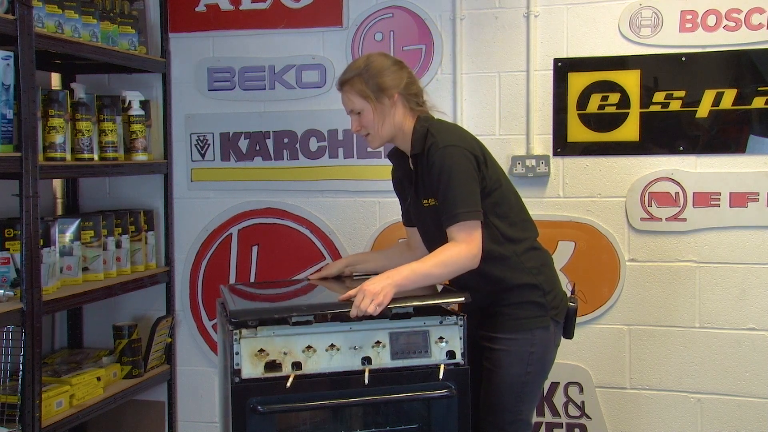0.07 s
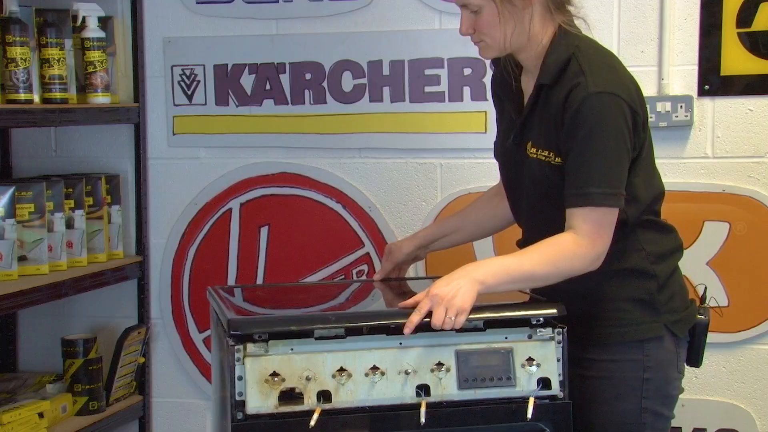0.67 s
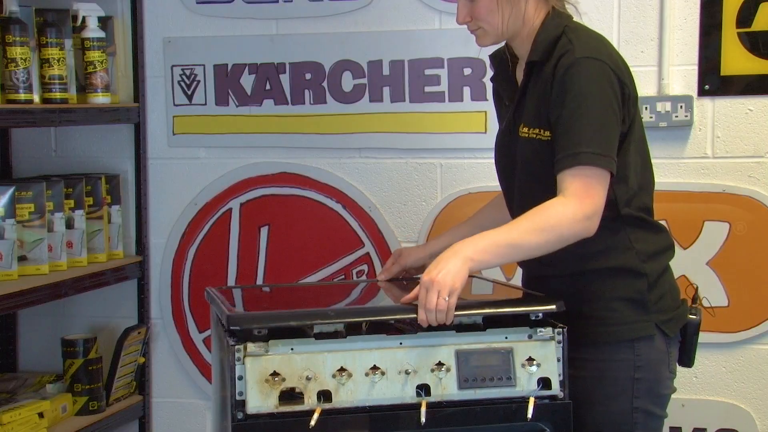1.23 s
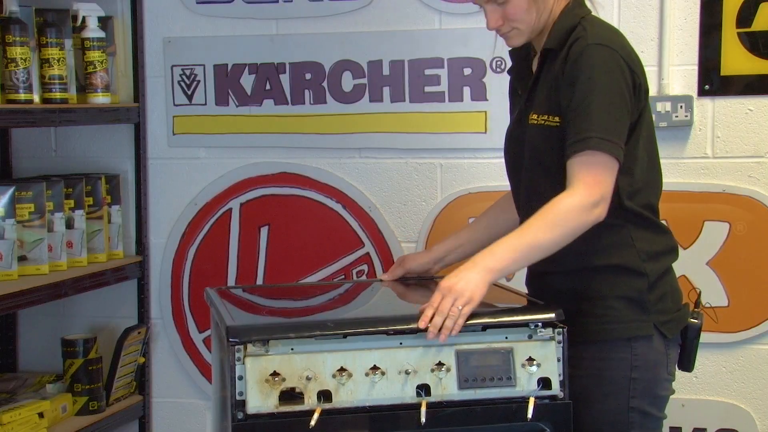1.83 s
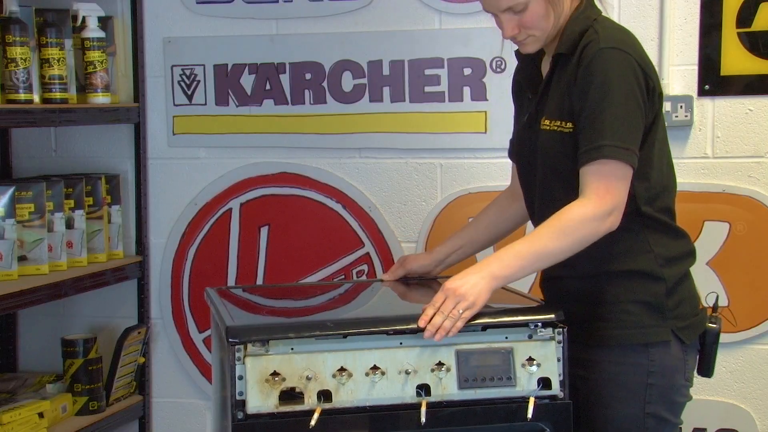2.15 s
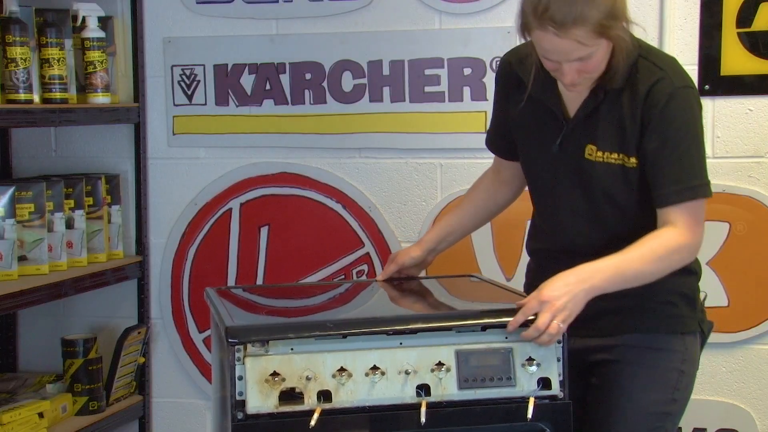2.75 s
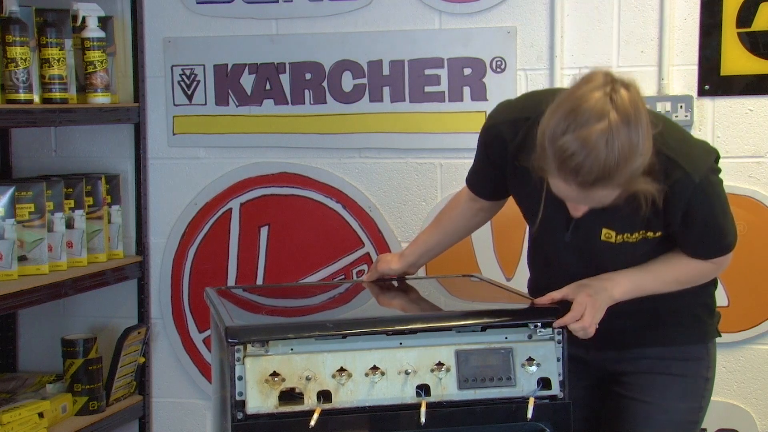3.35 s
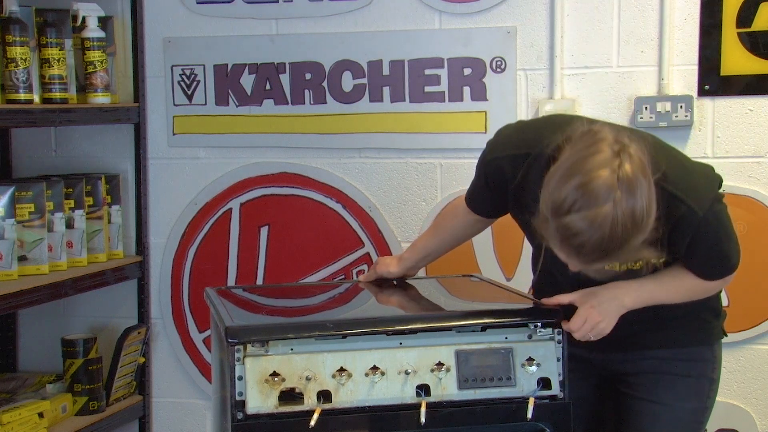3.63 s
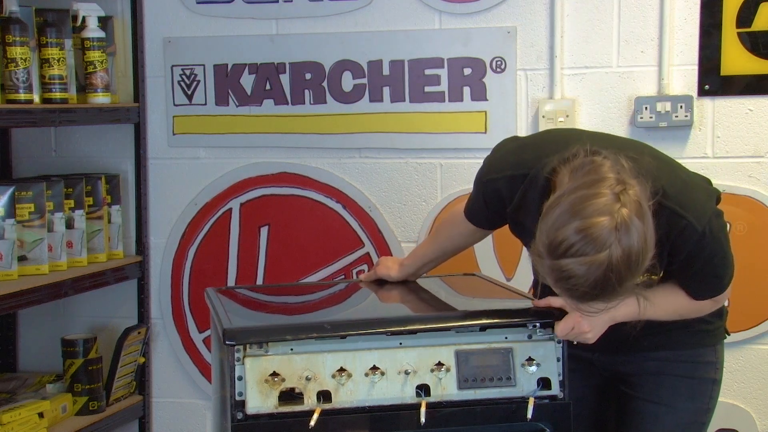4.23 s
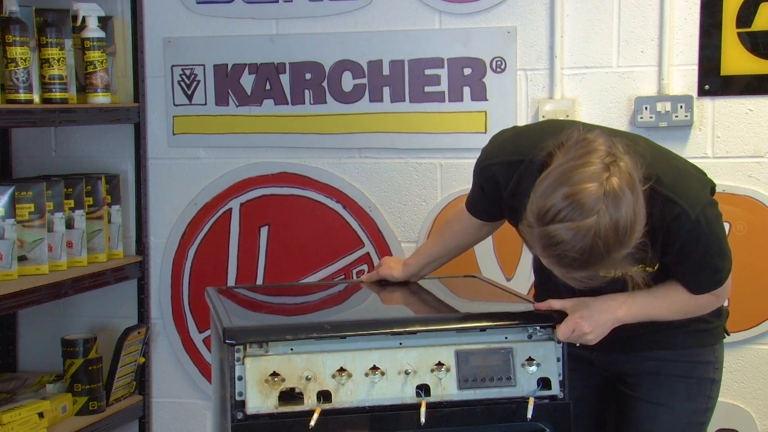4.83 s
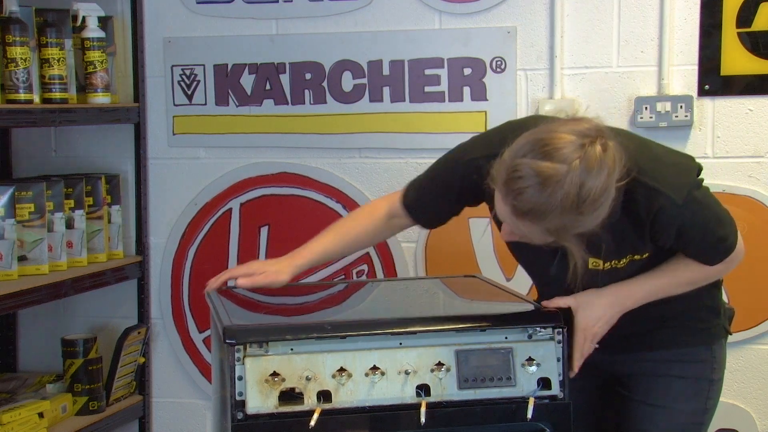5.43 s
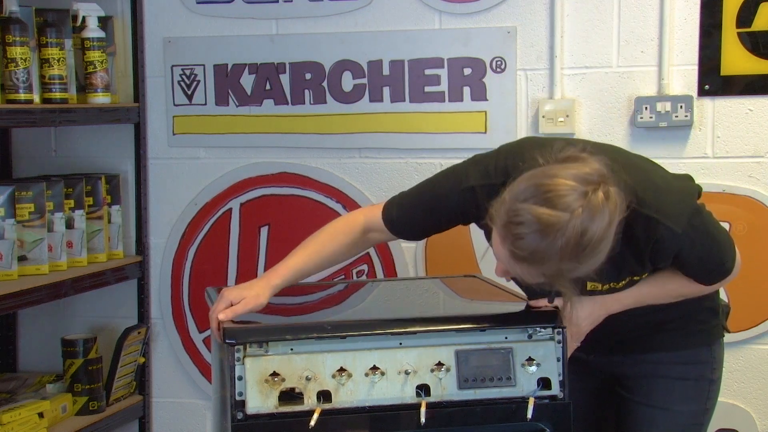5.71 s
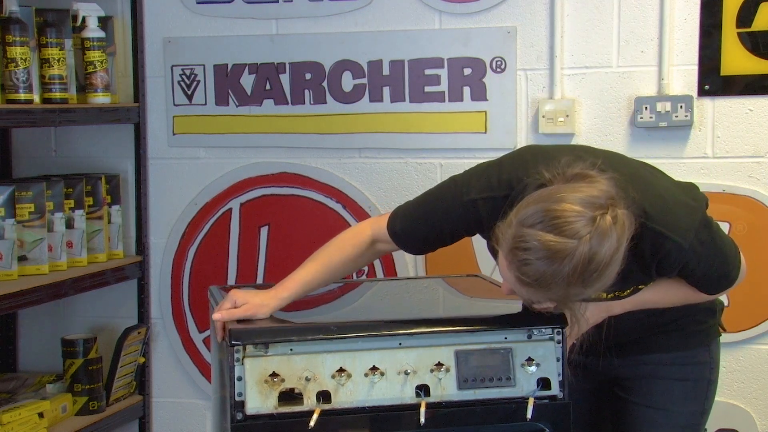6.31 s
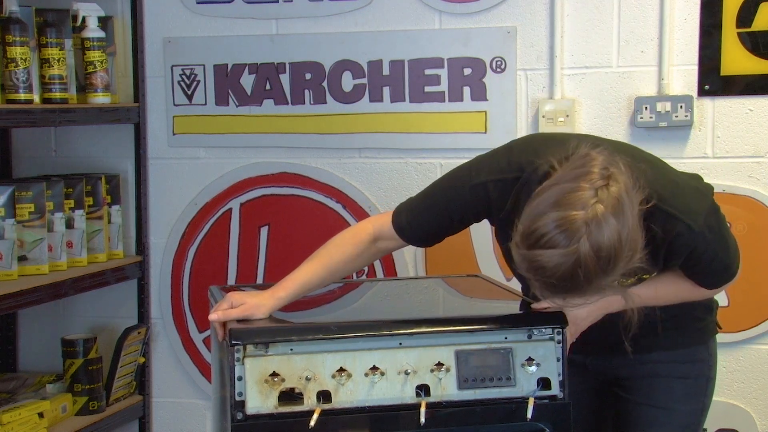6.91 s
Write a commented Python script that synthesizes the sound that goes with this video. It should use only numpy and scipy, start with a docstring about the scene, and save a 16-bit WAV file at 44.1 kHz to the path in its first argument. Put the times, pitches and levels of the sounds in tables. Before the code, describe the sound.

A thin steel panel knocks and clatters down onto a hollow oven cabinet, each hit leaving a short metallic ring. Its edges stick and slip along the frame in brief scrapes, with a few light taps and pauses. More knocks lead to one firm clank, then a final bunch of softer knocks and scrapes. Faint workshop air and a low hum continue underneath.

```python
"""Over faint workshop air and mains hum, a sheet-metal top panel is lowered onto an oven.
It lands in a flurry of knocks, loudest from 0.7 to 1.5 s: each a snap and a short clatter of thin
sheet, with panel and hollow cabinet ringing on. Shifted by hand, its edges stick and slip along the
frame in short scrapes among sparse, lighter taps. From about 4 s it is pressed home, with a firm
clank near 4.75 s and a last cluster of knocks and scrapes around 6 s."""
import sys
import numpy as np
from scipy import signal
from scipy.fft import rfft, irfft, next_fast_len
from scipy.io import wavfile

SR = 44100
rng = np.random.default_rng(int(sys.argv[2]) if len(sys.argv) > 2 else 0)


def digitize_waveform(pressure):
    """Quantize a signal to 16-bit integers and store it at the path in sys.argv[1].

    Rows of a 2-D input are taken as channels; values are limited to [-1, 1].
    """
    field = np.atleast_2d(pressure).T
    bounded = np.clip(field, -1, 1)
    quanta = np.round(bounded * 32767).astype(np.int16)
    wavfile.write(sys.argv[1], SR, quanta)


N = 307377
T = np.arange(int(1.2 * SR)) / SR  # seconds within one contact
FFT_SIZE = 65536
HZ = np.fft.rfftfreq(FFT_SIZE, 1 / SR)


def amp(db):
    """Decibels to gain."""
    return 10 ** (np.asarray(db) / 20)


def along(curve, hz):
    """Read a curve of (frequency, value) points on a log frequency axis."""
    freqs, values = np.transpose(curve)
    return np.interp(np.log(hz + 1), np.log(freqs + 1), values)


def fade(t, t60):
    """Exponential decay, 60 dB down after t60 seconds."""
    return np.exp(-np.log(1000) * t / np.maximum(t60, 1e-4))


# Bass-heavy EQ of the room tone: freq_hz, gain_db
ROOM_EQ = [(12, -24.5), (20, -16.5), (43, 1), (101, -1), (127, -5), (193, -8.5), (301, -11.5), (377, -11.5),
           (410, -14), (1290, -25.5), (1810, -27), (12100, -35), (16000, -36.5)]
# Mains hum partials: pitch_hz, level_db
MAINS_HUM = [(50, -68), (100, -67.5)]

def room_tone():
    """The bed: steady workshop air with a faint mains hum."""
    size = next_fast_len(N + SR)
    eq = amp(along(ROOM_EQ, np.fft.rfftfreq(size, 1 / SR)))
    air = irfft(rfft(rng.standard_normal(size)) * eq, size)[:N]
    air /= np.sqrt(np.mean(air ** 2))
    t = np.arange(N) / SR
    hum = sum(amp(db) * np.sqrt(2) * np.sin(2 * np.pi * (hz * t + rng.random())) for hz, db in MAINS_HUM)
    return amp(-61) * air + hum


# Modes of panel and cabinet: pitch_hz, relative_db, t60_s
STEEL_MODES = [(85.22, 10.5, 1.08), (128.06, 17.5, 0.68), (196, 6.5, 0.61), (215, 8, 1.07),
               (258.3, 6, 1.12), (293.5, 12.5, 1.04), (442, 9.5, 1.17), (494, 0, 1.38), (580, -4, 1.2),
               (700, -4, 0.69), (719, 3.5, 1.6), (793, 8.5, 1.2), (878, 9, 0.48), (945, 0.5, 1.94),
               (1020, -6.5, 1.4), (1045, 10.5, 0.81), (1104, 2, 0.73), (1233, 9, 0.67), (1412, -0.5, 1.07),
               (1350, 5.5, 0.32), (1530, 17.5, 0.17), (1590, 13, 0.38), (2061, 24.5, 0.17), (2364, -1, 0.5),
               (2505, -1.5, 0.54), (3230, 7, 0.63), (3970, -17.5, 0.18)]

def steel_modes():
    """The pitched ring of the steel: one decaying complex sine per mode."""
    modes = [amp(db) * fade(T, t60) * np.exp(2j * np.pi * hz * T) for hz, db, t60 in STEEL_MODES]
    return np.array(modes, np.complex64)


# Quick clatter of the sheet: freq_hz, t60_s
CLATTER_DECAY = [(50, 0.3), (200, 0.26), (1000, 0.15), (4000, 0.09), (12000, 0.068)]
# Lingering wash of cabinet and room: freq_hz, t60_s
WASH_DECAY = [(50, 2.5), (100, 1.5), (300, 1.0), (800, 0.8852), (1500, 0.79), (3000, 0.36), (6000, 0.15),
              (14000, 0.23)]
# EQ of the wash against the clatter: freq_hz, gain_db
WASH_EQ = [(50, -18), (120, -8.5), (400, -8), (1500, -15), (4000, -5), (12000, -4)]

def panel_response(modes, ring_db, modes_db):
    """The panel answers a contact with clatter, then a tail of wash and modes set by ring_db."""
    hz, t, noise = signal.stft(rng.standard_normal((2, len(T))), SR, nperseg=256)
    clatter = noise[0] * fade(t, along(CLATTER_DECAY, hz)[:, None])
    wash = noise[1] * fade(t, along(WASH_DECAY, hz)[:, None])
    wash *= amp(along(WASH_EQ, hz) + ring_db)[:, None]
    dense = signal.istft(clatter + wash, SR, nperseg=256)[1][:len(T)]
    # every contact point drives the modes with its own strengths and phases
    drive = amp(2 * rng.standard_normal(len(modes))) * np.exp(2j * np.pi * rng.random(len(modes)))
    ring = (drive.astype(np.complex64) @ modes).real
    return dense + amp(modes_db + ring_db) * ring


def equalise(sound, gain_db):
    """Minimum-phase EQ with a gain at each frequency of HZ; nothing rings ahead of the attack."""
    cepstrum = irfft(np.log(amp(gain_db)))
    cepstrum[1:FFT_SIZE // 2] *= 2
    cepstrum[FFT_SIZE // 2 + 1:] = 0
    return irfft(rfft(sound, FFT_SIZE) * np.exp(rfft(cepstrum)))[:len(T)]


# Borders of the thud, boom, knock, clank, clink and tick bands: edge_hz
BAND_EDGES = [25, 90, 300, 800, 1800, 5500, 16000]
BAND_HZ = np.sqrt(np.multiply(BAND_EDGES[1:], BAND_EDGES[:-1]))

def band_levels(balance_db, strength_db, tilt_db, thud_db, spot_hz, spot_db):
    """Thud, then five upper bands: each contact's tilt sets its brightness, and it favours its spot."""
    hz = BAND_HZ[1:]
    brightness_db = tilt_db * np.log2(hz / 700)
    skirt_db = 0.89 * spot_db * np.exp(-(np.log2(hz / spot_hz) / 0.75) ** 2)  # broad lift at the spot
    return np.r_[thud_db, strength_db + np.array(balance_db) + brightness_db + skirt_db]


# How well the sheet radiates: freq_hz, gain_db
SHEET_EQ = [(20, -11.5), (50, -8.5), (83, 6), (130, 3.5), (205, 5.5), (295, 5.5), (470, 2), (750, 3),
            (1350, 5.5), (2000, 1.5), (3200, 0), (5000, -3), (11000, -10), (16000, -21)]

def voice_contact(sound, start_s, levels_db, spot_hz, spot_db):
    """Colour a sound by its spot on the sheet; steer its bands to levels_db over 60 ms from start_s."""
    # each spot has one strong resonance and many weak, unevenly excited ones
    peak_db = spot_db / (1 + (np.log((HZ + 1) / spot_hz) / 0.13) ** 2)
    ripple_hz = np.geomspace(350, 12000, 150)
    ripple_db = np.interp(HZ, ripple_hz, 2.5 * rng.standard_normal(len(ripple_hz)), 0, 0)
    gain_db = peak_db + along(SHEET_EQ, HZ) + ripple_db
    count = int(0.06 * SR)
    window = sound[int(start_s * SR):][:count]
    power = 2 * np.abs(rfft(window, FFT_SIZE)) ** 2 / (FFT_SIZE * count)
    for _ in range(2):  # neighbouring bands overlap, so their gains settle in two steps
        band_power = np.add.reduceat(power * amp(2 * gain_db), np.searchsorted(HZ, BAND_EDGES))[:-1]
        trim_db = levels_db - 10 * np.log10(band_power + 1e-20)
        gain_db += along(np.c_[BAND_HZ, trim_db], HZ)
    return equalise(sound, gain_db)


def add(track, start_s, sound):
    """Mix a sound into the track from start_s."""
    i = max(0, round(start_s * SR))
    track[i:i + len(sound)] += sound[:max(0, N - i)]


# Tonal balance of a blow, boom to tick: offset_db
BLOW_BALANCE = [-1, 1, -6.5, -8, -16.5]
# Cue list of the panel striking the cabinet, levels relative:
# start_s, strength_db, tilt_db_per_octave, thud_db, snap_db, spot_hz, spot_db
BLOW_CUES = [(0.01, -41.5, -2, -44.5, -14, 199, 6), (0.222, -49, -2.5, -50, -5, 203, -4),
             (0.235, -47.5, -7.5, -39.5, 1, 639, 8.5), (0.353, -59, 1.5, -47, -18, 6540, 7),
             (0.619, -48, -1.5, -36, -6.5, 3680, 1), (0.652, -44, -2.5, -44, -9, 6500, 6),
             (0.683, -39, -0.5, -42, -10, 464, 8), (0.6907, -31, -1, -51, 5, 720, 1),
             (0.822, -30.5, -2.5, -36, -11, 910, 6.5), (0.841, -32.5, 0.2, -40, -12, 1100, 4.5),
             (0.864, -25.5, 0.06, -39.5, -3, 1302, 6.5), (0.944, -35.5, -0.9, -38.5, -6, 1460, 5.5),
             (0.991, -45.5, -1, -58, -7.5, 200, 18), (1.109, -48.5, -0.5, -38.5, -3.5, 660, 12),
             (1.4396, -28.5, 0.5, -26.5, 0.5, 8630, 12.5), (1.4458, -26, -1.2, -29.5, -10.5, 1297, 6.5),
             (1.451, -45, -4.5, -41, 1, 207.6, 19.5), (1.469, -29, 0, -58.5, -11, 500, 0.5),
             (1.494, -38.5, 2, -60, -13, 1064, 10), (2.02, -56, 1, -43.5, -17, 1410, 1.5),
             (2.039, -39, 3.5, -53.5, -0.5, 4150, 10), (2.042, -43.5, 1, -68.5, -7, 1153, 15.5),
             (3.269, -52.5, 0.26, -77, -11.5, 5200, 8.5), (3.719, -65.5, 5, -59, 13, 6700, 4.5),
             (4.112, -69, 1.3, -69, 14, 2860, 3), (4.139, -59, 2.5, -47, -11, 3120, 9.5),
             (4.198, -41.5, 0.94, -51, -5, 2020, 5.5), (4.213, -69.5, -4, -36, 6, 154.6, 25),
             (4.2478, -49.5, 1, -68, 1, 10600, 2.5), (4.44, -49, 0.14, -51, -4.5, 1990, 8),
             (4.658, -48.5, 1, -49, -29, 7800, 8.5), (4.7399, -37.5, -3.5, -43, 16.5, 618, 10.5),
             (4.744, -30, -1.9, -36.5, 5, 2830, 10), (4.758, -34.5, -0.8, -32.5, -21, 200, 8.5),
             (5.183, -61, 0.5, -51, 1, 2750, 4.5), (5.648, -79.5, 7, -94, 2, 5200, 11),
             (5.834, -46, -1.4, -39.5, -11.5, 420, 6.5), (5.853, -47.5, -5, -40.5, -5, 1130, -2),
             (5.896, -43, 1.1, -58, -4, 2500, -4.5), (6.108, -63.5, 2.5, -81, -21, 3150, 4),
             (6.15, -44.5, -0.5, -41, -19, 210, 9), (6.216, -37, -0.4, -39.5, 6, 1120, 4.5),
             (6.229, -62, -7.5, -63.5, -4, 146, 15), (6.325, -58.5, 3, -49, -29, 1625, 23.5),
             (6.465, -67.5, 4, -69, -23.5, 1600, 26)]

def blows(modes):
    """Steel meets steel: a dull push and a snap of a few milliseconds, then the panel's answer."""
    track = np.zeros(N)
    push = fade(T, t60=0.0044)
    push *= amp(29) / push.sum()
    for start_s, strength_db, tilt_db, thud_db, snap_db, spot_hz, spot_db in BLOW_CUES:
        levels_db = band_levels(BLOW_BALANCE, strength_db, tilt_db, thud_db, spot_hz, spot_db)
        ring_db = -1.5 - 0.15 * (strength_db + 40)  # firmer blows have less tail for their clatter
        snap = amp(10.5) * fade(T, t60=0.008) * rng.standard_normal(len(T))
        # the struck spot sings briefly, with an inharmonic plate overtone
        phase = 2 * np.pi * spot_hz * T
        ping = fade(T, t60=0.179) * (amp(-29) * np.sin(phase) + amp(-26) * np.sin(1.7 * phase))
        answer = panel_response(modes, ring_db, modes_db=-43)
        hit = amp(snap_db) * (push + snap) + ping + answer
        add(track, start_s, voice_contact(hit, 0, levels_db, spot_hz, spot_db))
    return track


# Tonal balance of a scrape, boom to tick: offset_db
SCRAPE_BALANCE = [-5, -0.5, -2.5, -3, -12.5]
# Cue list of the panel sliding on the frame, levels relative, rise and fall timed per 10 dB:
# peak_s, rise_s, fall_s, strength_db, tilt_db_per_octave, spot_hz
SCRAPE_CUES = [(0.15, .05, 0.055, -44, -2.5, 414), (0.411, 0.037, 0.019, -53.5, -2.3, 6750),
               (0.9, .03, 0.061, -54, 4, 1165), (2.294, .016, 0.044, -51, -0.9, 1580),
               (2.53, 0.027, 0.075, -55, 0.56, 1170), (3.701, 0.041, 0.0086, -80, 5, 8750),
               (4.159, 0.018, 0.037, -78, 7.5, 2970), (4.191, 0.034, 0.01, -45, -1.9, 3960),
               (4.712, 0.048, 0.028, -49.5, -3, 8100), (5.906, .043, 0.0064, -51.5, 0.64, 2560),
               (6.191, 0.045, 0.018, -43, -0.47, 9150), (6.354, 0.017, 0.032, -48.5, 0.8, 2130),
               (6.48, .01, 0.031, -55.5, 1, 2020)]

def scrapes(modes, slips_per_s=1307, spread_db=6.5, spot_db=7):
    """An edge sticks and slips at random; each tiny slip excites the panel."""
    track = np.zeros(N)
    for peak_s, rise_s, fall_s, strength_db, tilt_db, spot_hz in SCRAPE_CUES:
        thud_db = strength_db - 15
        levels_db = band_levels(SCRAPE_BALANCE, strength_db, tilt_db, thud_db, spot_hz, spot_db)
        lead_s = 2 * rise_s
        pressure = amp(-10 * np.maximum((lead_s - T) / rise_s, (T - lead_s) / fall_s))
        slipping = rng.random(len(T)) < slips_per_s / SR
        slips = slipping * amp(spread_db * rng.standard_normal(len(T))) * rng.choice([-1, 1], len(T))
        answer = panel_response(modes, ring_db=-9, modes_db=-37.5)
        answer[0] += amp(21.5)  # each slip is also heard directly
        rub = signal.fftconvolve(slips * pressure, answer)[:len(T)]
        rub = voice_contact(rub, max(0, lead_s - 0.01), levels_db, spot_hz, spot_db)
        add(track, peak_s - lead_s, rub)
    return track


def scene():
    """Mono mix: blows and scrapes over the room tone."""
    modes = steel_modes()
    panel = amp(-3.5) * blows(modes) + amp(-4.5) * scrapes(modes)
    return (panel + room_tone())[None]


def record(dry):
    """A steep high cut on the whole mix."""
    cutoff_hz, taper_hz = 15950, 400
    size = next_fast_len(N + SR)
    hz = np.fft.rfftfreq(size, 1 / SR)
    gain = np.clip((cutoff_hz - hz) / taper_hz + 0.5, 0, 1)
    return irfft(rfft(dry, size) * gain, size)[:, :N]


dry = scene()
out = record(dry)
digitize_waveform(out)
```